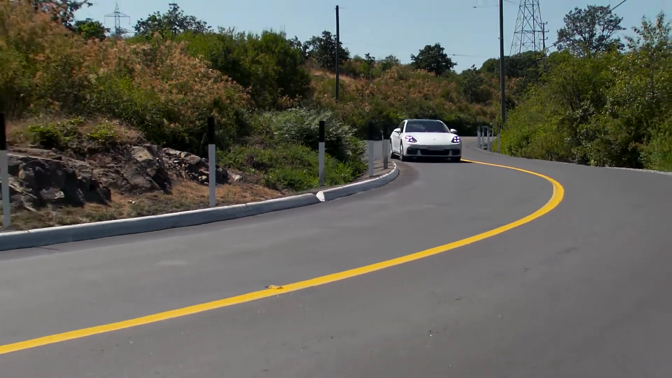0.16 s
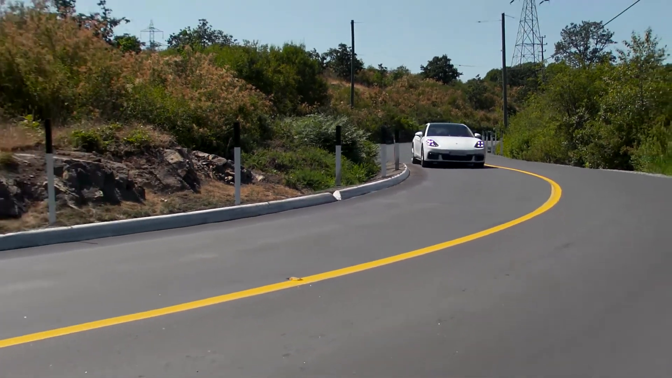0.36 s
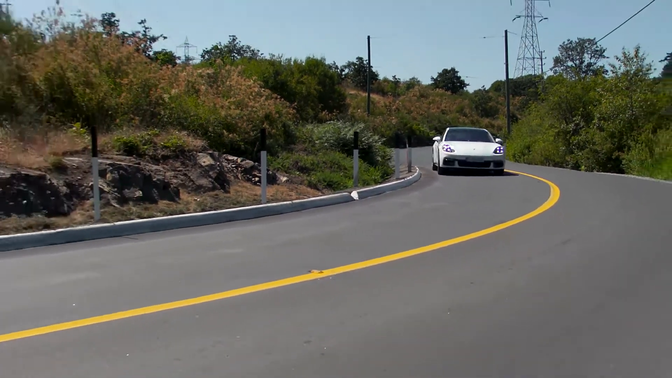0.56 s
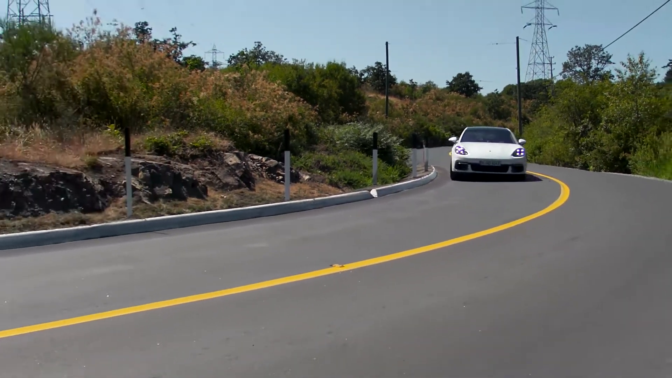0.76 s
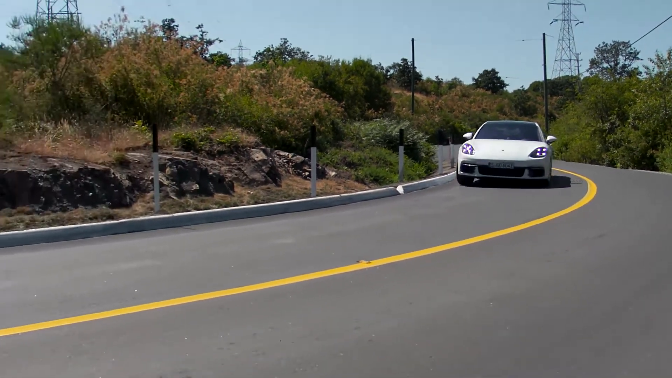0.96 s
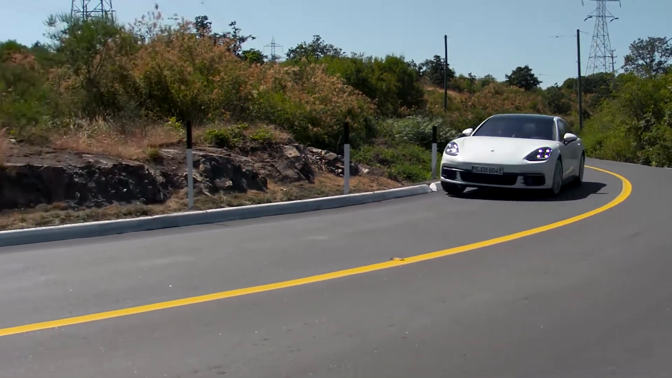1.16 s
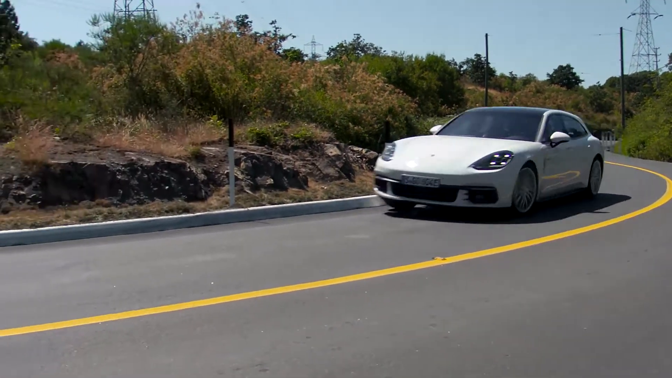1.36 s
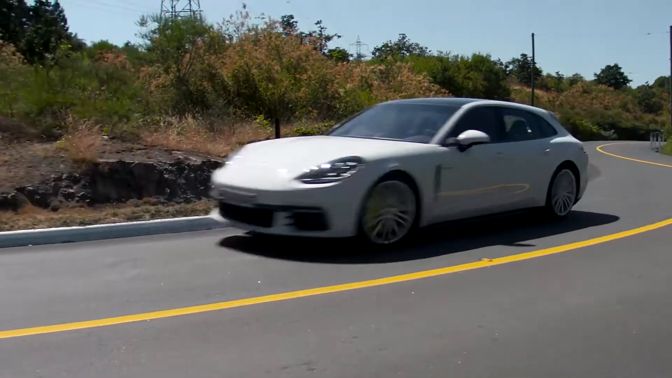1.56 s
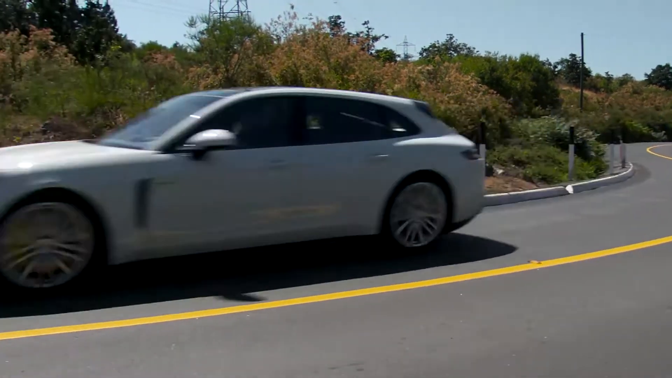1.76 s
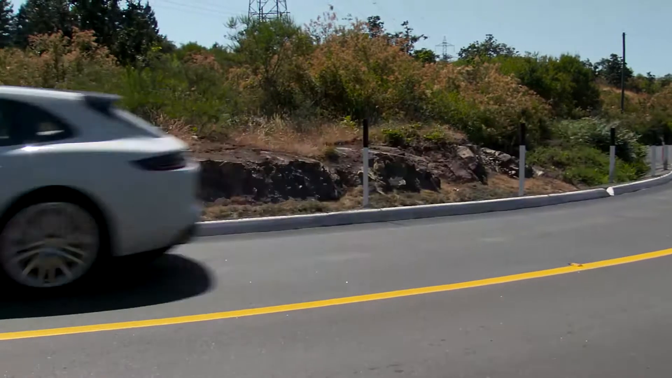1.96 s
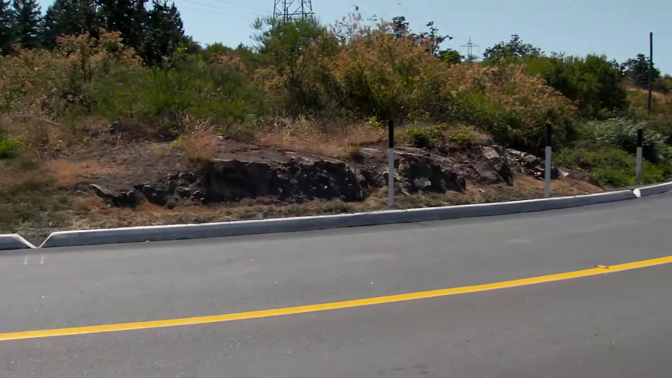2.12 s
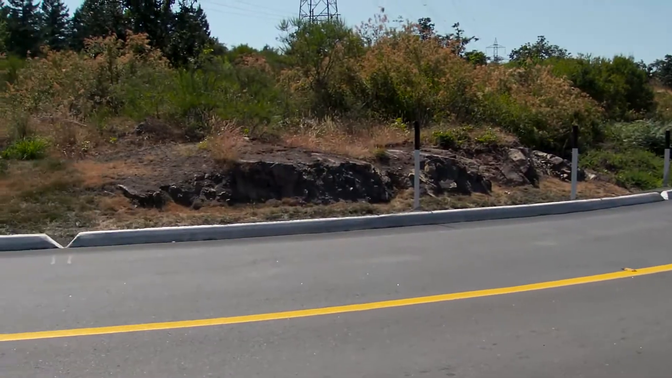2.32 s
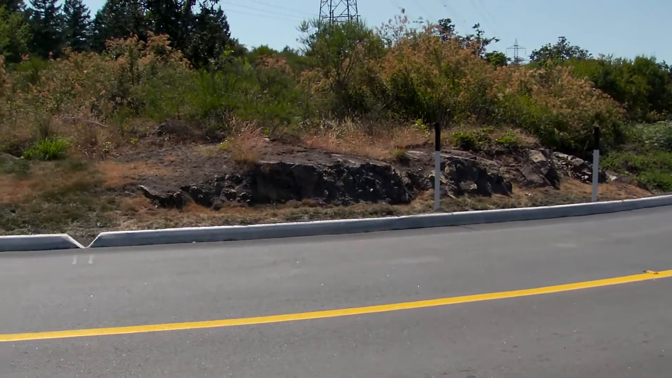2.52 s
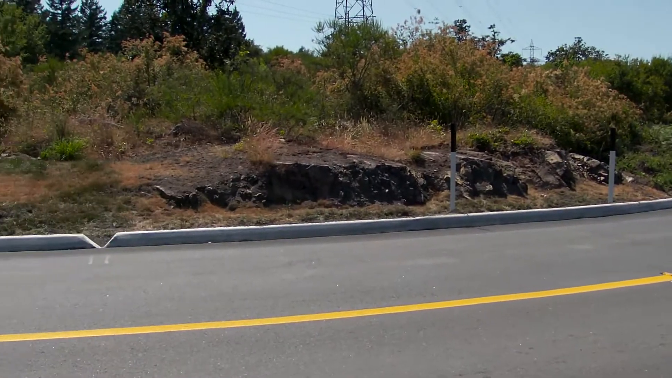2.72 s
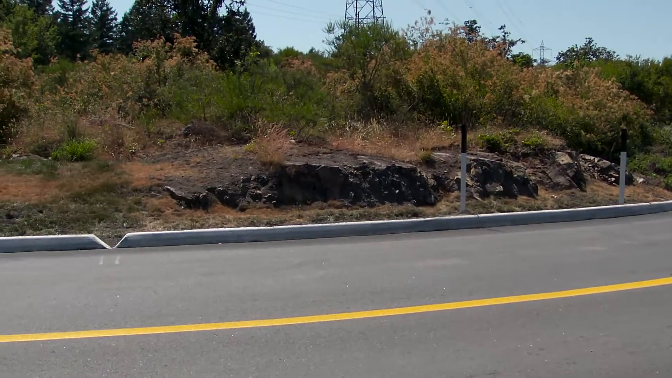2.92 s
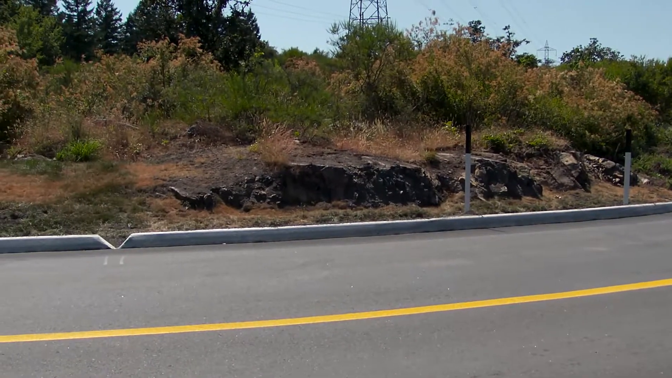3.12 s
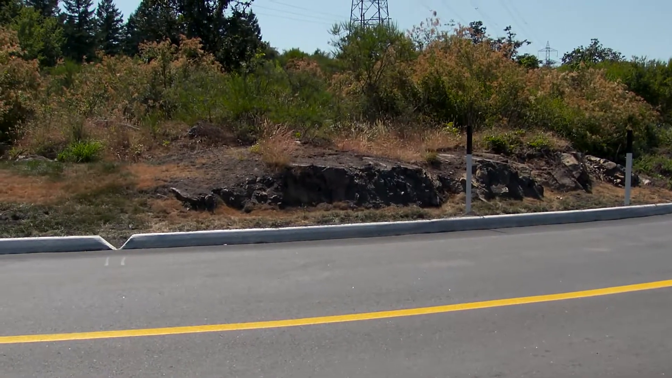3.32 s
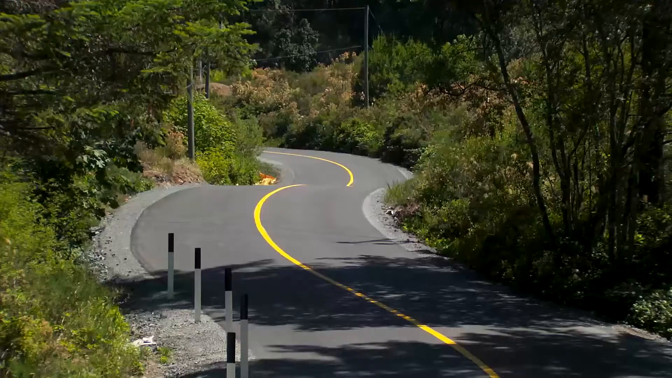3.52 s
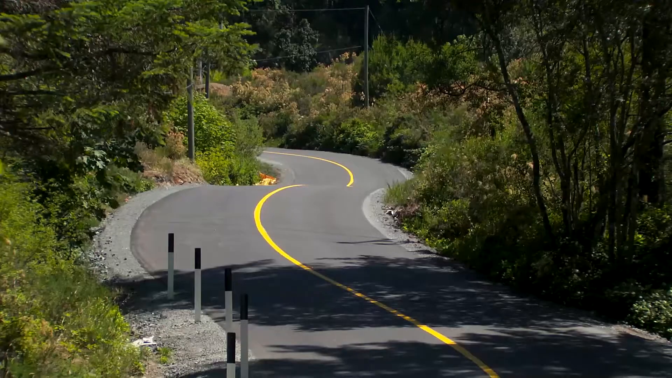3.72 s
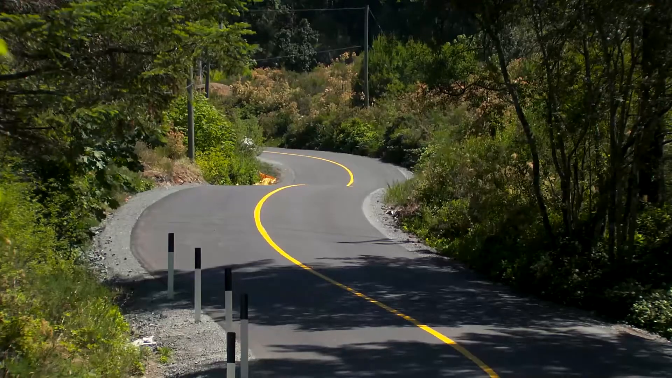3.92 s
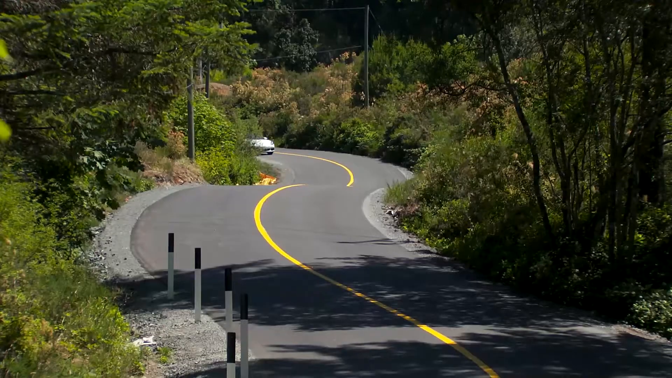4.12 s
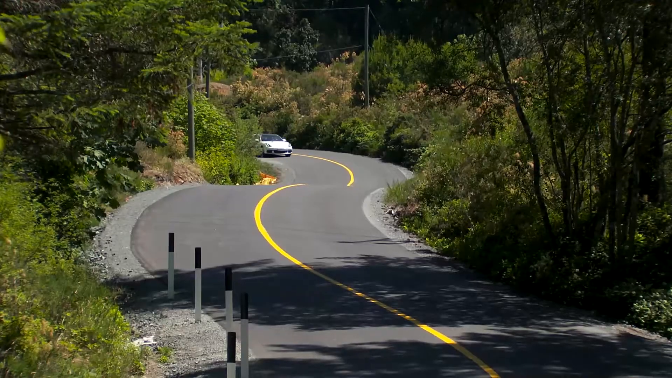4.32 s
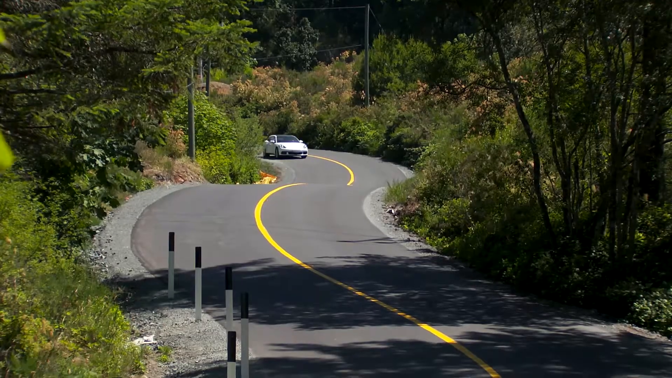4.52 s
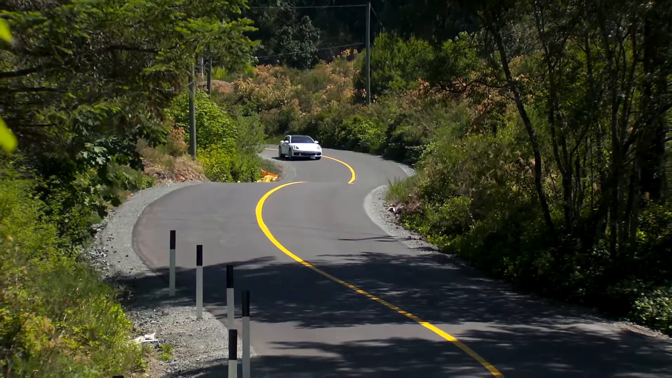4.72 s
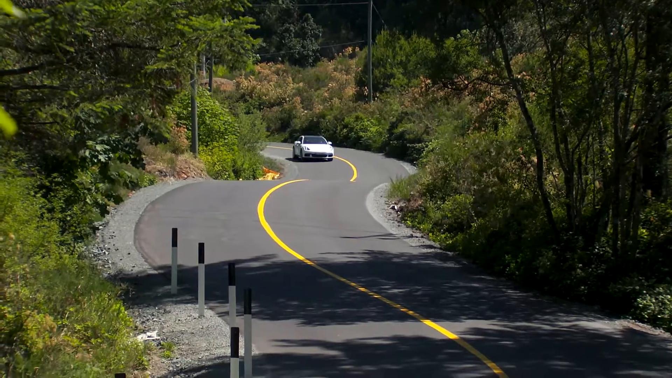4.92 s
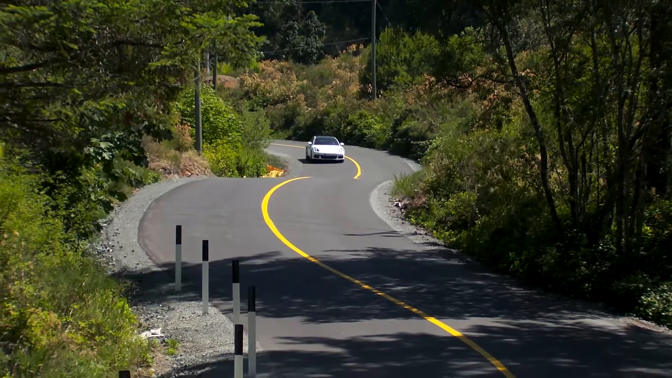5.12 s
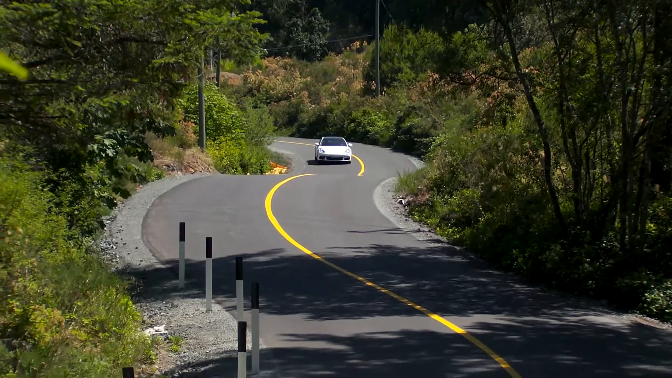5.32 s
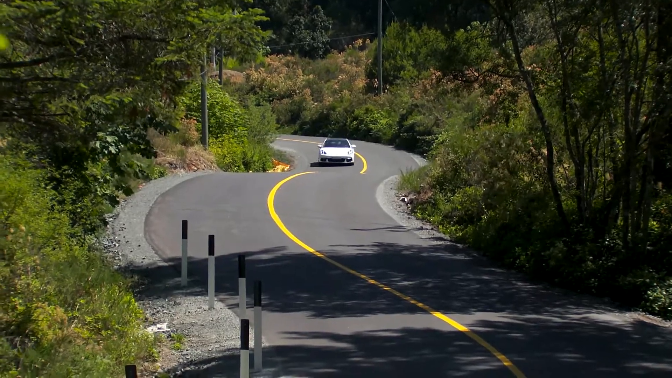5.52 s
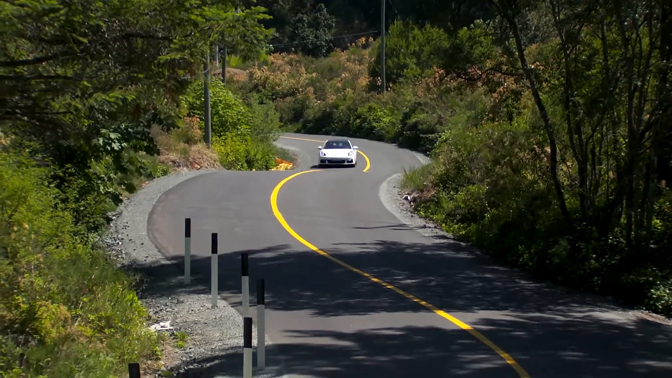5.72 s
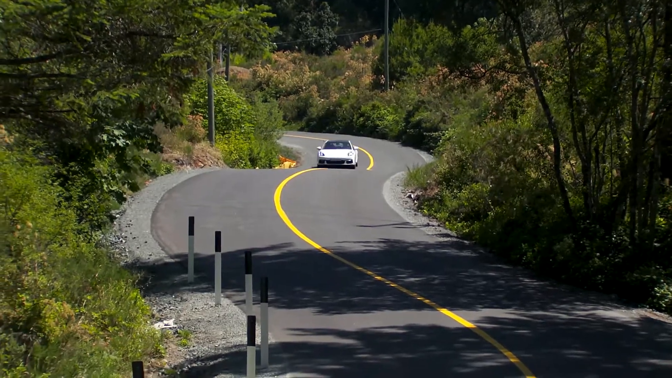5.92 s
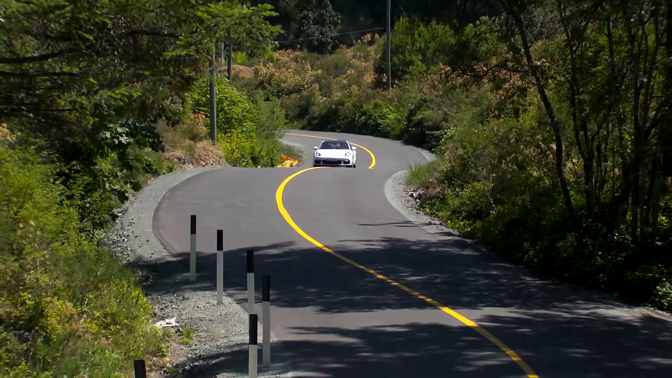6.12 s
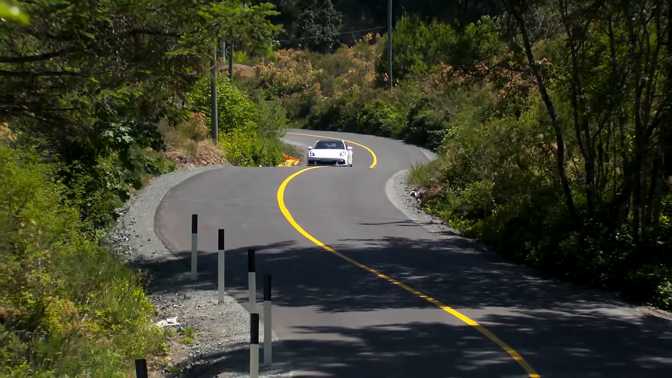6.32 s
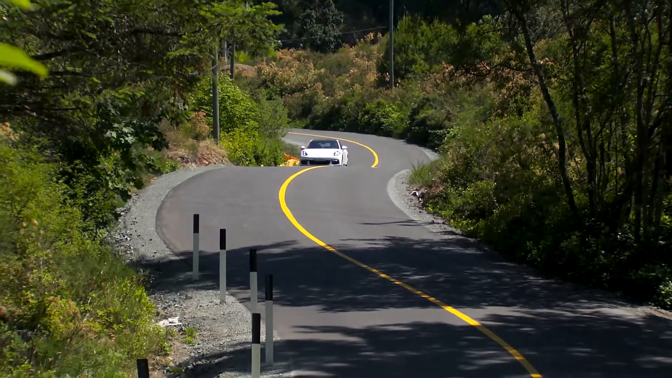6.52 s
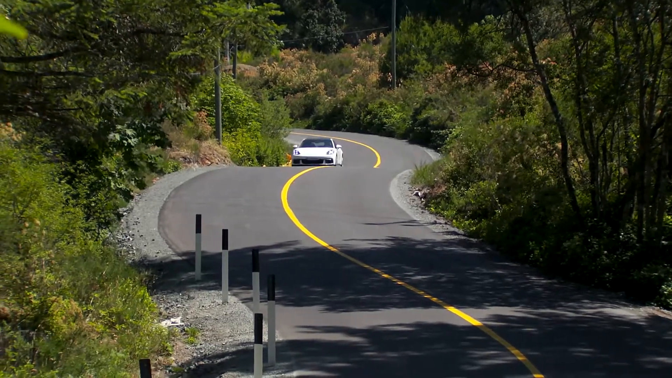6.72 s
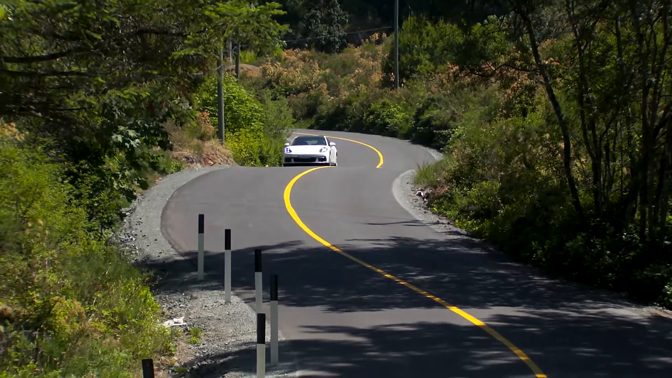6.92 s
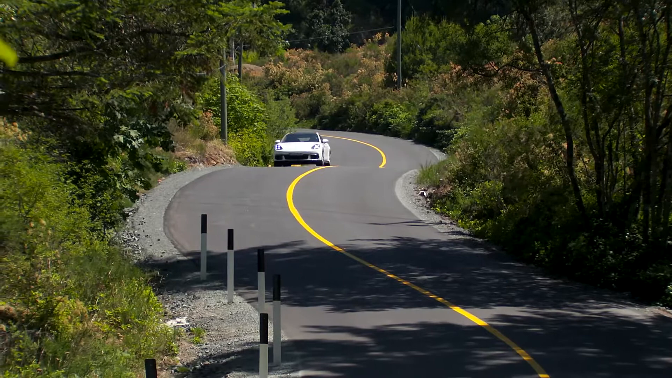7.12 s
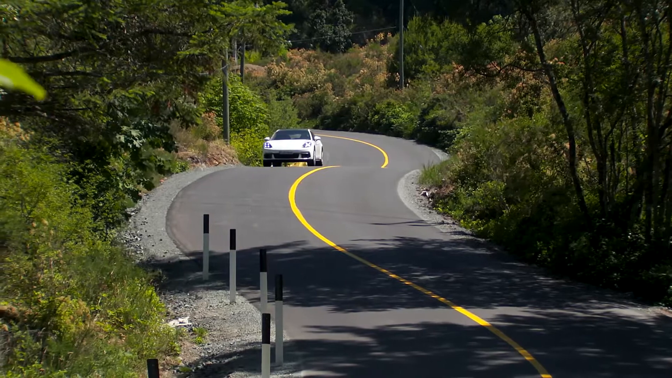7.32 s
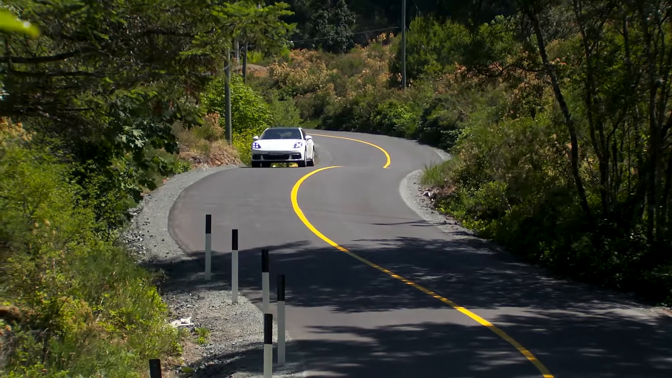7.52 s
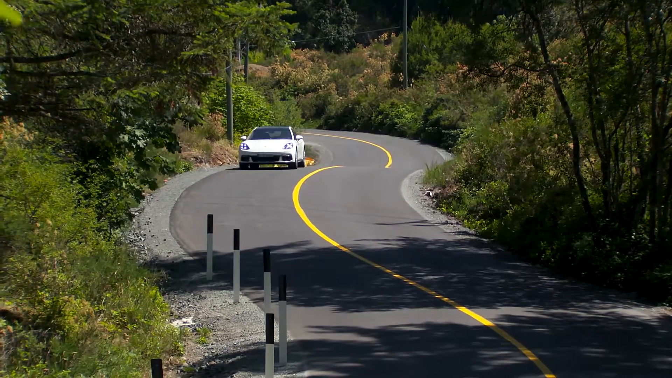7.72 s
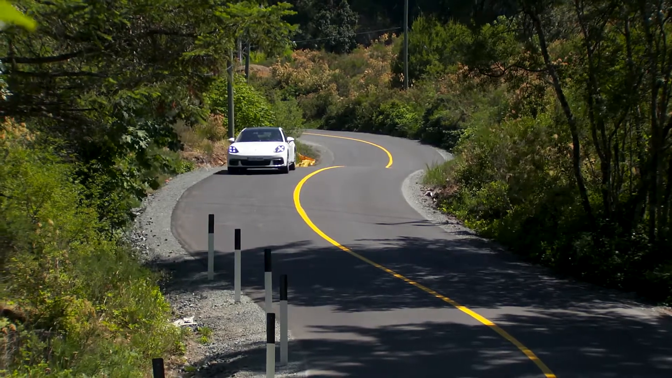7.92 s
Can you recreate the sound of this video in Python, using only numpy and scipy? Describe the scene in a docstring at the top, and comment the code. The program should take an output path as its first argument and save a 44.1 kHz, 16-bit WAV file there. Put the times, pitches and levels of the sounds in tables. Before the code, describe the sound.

Tyre roar and exhaust hum swell as a car rounds a bend, its tyres moaning briefly just before it passes the roadside microphone. As it recedes, the sound falls abruptly to a soft hillside hush. From this second position the car is much quieter, revving up in the distance and slowly coming closer, with another faint moan from the tyres. Light, low wind thumps touch the microphone now and then.

```python
"""A six-cylinder car sweeps through a hillside bend and pulls away; then, from a second spot, it is
heard far off, climbing nearer. Its exhaust hums at multiples of the firing rate and a part under the
bonnet ticks along. The tyres roar on the road and moan under load as their tread sticks and slips.
Behind it lie a hillside hush, a few dry ticks and light wind bumping the microphone."""
import sys
import numpy as np
from scipy import signal
from scipy.io import wavfile
from scipy.ndimage import uniform_filter1d

SR = 44100
rng = np.random.default_rng(int(sys.argv[2]) if len(sys.argv) > 2 else 0)


def unload_audio(sound):
    """Save the sound as a 16-bit wav file, at the path given as the first command line argument."""
    columns = np.transpose(np.atleast_2d(sound))
    # keep every value between -1 and 1, then stretch to whole-number steps
    steps = np.round(np.clip(columns, -1, 1) * 32767)
    wavfile.write(sys.argv[1], SR, steps.astype(np.int16))


N = 355446
TIME = np.arange(N) / SR
SECOND_SPOT_S = 3.555  # the listening position changes here


def gain_of(db):
    return 10 ** (np.asarray(db) / 20)


def unit_rms(x):
    return x / np.sqrt(np.mean(x ** 2) + 1e-20)


def bell(x, centre, width):
    return np.exp(-.5 * ((x - centre) / width) ** 2)


def eq_curve(points, hz):
    """Join (hz, value) points along a log frequency axis."""
    point_hz, value = np.transpose(points)
    return np.interp(np.log(hz + 1), np.log(point_hz + 1), value)


def automation(rows, t):
    """One curve over t for each column after the time column."""
    times, *columns = np.transpose(rows)
    return [np.interp(t, times, column) for column in columns]


def add(mix, start_s, sound):
    part = mix[round(start_s * SR):][:len(sound)]
    part += sound[:len(part)]


def wander(rate_hz, size=N):
    """Random modulation of rms 1, low-passed at rate_hz."""
    return unit_rms(signal.lfilter(*signal.butter(2, rate_hz, fs=SR), rng.standard_normal(size)))


def shaped_noise(spectrum_db, size=1024):
    """Noise whose power in each bin follows spectrum_db(hz, t)."""
    hop = size // 4
    frames, hz = N // hop + 5, np.fft.rfftfreq(size, 1 / SR)
    real, imag = rng.standard_normal((frames, len(hz), 2)).T
    spectra = (real + 1j * imag) * gain_of(spectrum_db(hz[:, None], np.arange(frames) * hop / SR))
    return np.sqrt(1.5) * signal.istft(spectra, nperseg=size, noverlap=size - hop)[1][:N]


def unit_band(shape_db, hz, low_hz, high_hz):
    """Shift a spectrum so that one band holds power 1."""
    band = (hz >= low_hz) & (hz < high_hz)
    return shape_db - 10 * np.log10(np.sum(gain_of(2 * shape_db) * band, 0))


# Swell of the breeze: time_s, level_db
WIND_LEVEL = [(0, -56.5), (.6, -66), (.95, -63), (1.2, -54.5), (1.45, -60.5), (1.7, -55), (2.05, -61),
              (2.4, -65.5), (2.7, -59), (3, -60.5), (3.5, -69), (4.08, -66), (4.22, -61), (4.44, -62),
              (4.52, -64.5), (4.75, -69.5), (5.2, -71), (6, -67.5), (6.7, -63), (7, -56), (7.2, -59),
              (7.4, -58.5), (8.06, -60)]
# Its bass-heavy colour: freq_hz, gain_db
WIND_EQ = [(12, -32), (24, -6), (36, 1.5), (50, 4), (80, 2.5), (130, 3), (200, -30), (350, -100)]
# Bumps on the microphone: start_s, knock_db, knock_hz, push_db
WIND_BUMPS = [(0.182, -40, 129.5, -48), (0.546, -42.5, 89, -41), (1.032, -44, 74, -52.5),
              (4.163, -51.5, 102.6, -59.5), (4.3, -61.5, 84.7, -53), (4.405, -55.5, 100.8, -57.5),
              (4.966, -45, 89.6, -67.5), (6.408, -48.5, 138, -66.5), (6.786, -51.5, 135.6, -59.5),
              (6.997, -52.5, 80.7, -49), (7.036, -49.5, 72.7, -52), (7.528, -52, 80.9, -53)]


def wind():
    """Lumpy low pressure on the microphone; each bump is a short sagging knock over a deep push."""
    def spectrum_db(hz, t):
        return unit_band(eq_curve(WIND_EQ, hz), hz, 25, 110) + automation(WIND_LEVEL, t)[0]
    out = shaped_noise(spectrum_db, size=4096) * gain_of(0.65 * wander(4.5))
    knock_s, push_s, push_hz = 0.0505, 0.1105, 41
    age = np.arange(round(push_s * SR)) / SR
    knock_shape = np.sin(np.pi * np.minimum(age / knock_s, 1))
    push = np.sin(np.pi * (age / push_s) ** 0.7) * np.sin(2 * np.pi * push_hz * age)
    for start_s, knock_db, knock_hz, push_db in WIND_BUMPS:
        knock = knock_shape * np.sin(2 * np.pi * knock_hz * age * (1 - 0.41 * age))
        add(out, start_s, gain_of(knock_db) * knock + gain_of(push_db) * push)
    return out


# Snaps nearby: start_s, prefilter_level_db
DRY_TICKS = [(6.8152, -65), (6.8553, -62), (7.5787, -63)]


def dry_ticks():
    """Tiny bursts of bright noise that die at once."""
    out, age = np.zeros(N), np.arange(600) / SR
    for start_s, level_db in DRY_TICKS:
        add(out, start_s, gain_of(level_db - 60 * age / 0.034) * rng.standard_normal(len(age)))
    return signal.lfilter(*signal.butter(2, [3500, 9000], "band", fs=SR), out)


# Base colour of road and tyre, shared by the hush: freq_hz, gain_db
ROAD_EQ = [(60, -36), (115, -13.5), (160, -6), (205, 0.5), (260, 1), (420, -1.5), (640, -1), (800, 0),
           (1300, 1), (2200, 1.5), (2700, 0), (4400, -2.5), (5100, -6.5), (8500, 1)]
# Dark tilt of the hush: freq_hz, gain_db
HUSH_EQ = [(240, 14.5), (400, 17), (680, 12.5), (1650, -0.64), (3300, -11), (6000, -14.5), (11000, -27),
           (15500, -25)]
# Treble ride on the hush: time_s, gain_db
HUSH_AIR = [(3.5, 5), (6, 4), (6.5, 2.5), (8.06, -9)]


def hillside_hush_db(hz, t):
    """Spectrum of the hillside's soft bed, 16 dB quieter at the first spot."""
    level_db, fade_s = -75, .15
    colour = unit_band(eq_curve(ROAD_EQ, hz) + eq_curve(HUSH_EQ, hz), hz, 1292, 2078)
    air = automation(HUSH_AIR, t)[0] * np.clip(hz / 6000 - 1, 0, 1)
    return level_db + colour + air - 16 * np.clip((SECOND_SPOT_S - t) / fade_s, 0, 1)


# Ride of the roar, bass and hiss against the mids: time_s, level_db, bass_db, hiss_db, groove_amount
ROAR_RIDE = [(0, -52.5, 11, -11, 1), (.15, -50.5, 7.97, -11.5, 0.5), (.3, -50, 8.7, -11, 0.5),
             (.6, -42.5, 5, -14, 3), (.9, -41, 5.45, -13, -0.5), (1.35, -34.5, 0.93, -11, 2.5),
             (1.55, -31, 2.3, -12, 3.5), (1.65, -33, 7.12, -8.5, 8.5), (1.8, -32, 5.5, -10, 4),
             (1.95, -34, 9.97, -8, 4), (2.1, -37, 13.2, -4.5, 5.5), (2.25, -37.5, 12.5, -5.5, 1.5),
             (2.55, -39, 5.4, -13.5, -1), (2.85, -43, 4.7, -21, -2.5), (3, -47.5, 6.24, -23.5, -3),
             (3.35, -49.5, 3.34, -25.5, -1), (3.5, -57.5, 6.3, -24, 1), (3.62, -63.5, 2.95, -30.5, -0.5),
             (3.68, -79.5, 5, -19.5, 4), (3.9, -81.5, 6, -8, 1), (4.3, -75, 14.4, -6.5, 2.5),
             (4.7, -65.5, 10.96, -13.5, 4.5), (5.1, -62, 11.6, -7.5, 4), (5.5, -61.5, 9.15, -12, 4),
             (6.1, -61.5, 8, -10.5, 4), (6.3, -60.5, 7.9, -8, 7.5), (6.5, -59.5, 8.56, -14.5, 0.5),
             (6.9, -62, 9, -13.5, 0), (7.3, -56.5, 5.6, -12.5, 4.5), (7.6, -55.5, 4.97, -14.5, 5),
             (8.06, -52.5, 5.97, -13.5, 1.5)]
# Bands of its moving EQ: freq_hz
ROAR_BANDS = [240, 400, 680, 1650, 3300, 6000, 11000, 15500]
# Lowest band against the bass: time_s, gain_db
ROAR_RUMBLE = [(0, 6), (1, -1.5), (1.6, -1), (2, 0.5), (2.3, -1), (2.6, -0.5), (3.2, 6), (3.8, -1),
               (4.4, -2.5), (5.6, -8), (6.2, -0.5), (7, 3.5), (7.5, 4.5), (8.06, -1.5)]
# Upper treble against the hiss: time_s, gain_db
ROAR_FIZZ = [(0, -12), (.5, -9), (1, -13), (1.5, -11.5), (2, -11), (2.6, -12), (3, -9.5), (3.5, -11),
             (3.8, -10.5), (5, -11.5), (6.35, -13.5), (6.5, -5.5), (6.65, -11), (7.2, -10), (8.06, -15)]
# Ring of the tread grooves: time_s, pitch_hz, upper_ring_db
GROOVE_RING = [(0, 1107, 3.5), (1.3, 1110, 1), (2, 1055, -0.5), (3.5, 1080, 2), (5, 1098, 0),
               (6.3, 1018, 5), (6.9, 1038, 3.5), (7.3, 1051, 4), (8.06, 1050, 5)]


def car_roar_db(hz, t):
    """Spectrum of tyre and exhaust noise, bent by distance and the car's heading."""
    pass_s, opening_s, upper_ring_hz = 2.075, 1.92, 2182
    level, bass, hiss, groove_amount = automation(ROAR_RIDE, t)
    rumble = bass + automation(ROAR_RUMBLE, t)[0]
    fizz = hiss + automation(ROAR_FIZZ, t)[0]
    # The top of the treble survives only the short air path at the pass.
    slope_db_per_s = np.where(t < pass_s, 25, 22)
    top = -60 + np.maximum(30 - slope_db_per_s * abs(t - pass_s), 0)
    bands = [rumble, bass + 0.083 * (rumble - bass), bass, 0 * t, hiss, fizz, top, top + (top - fizz) / 2]
    tilt = sum(eq_curve(list(zip(ROAR_BANDS, weights)), hz) * band_db
               for weights, band_db in zip(np.eye(len(bands)), bands))
    colour = unit_band(eq_curve(ROAD_EQ, hz) + tilt, hz, 1292, 2117)
    # Air pumped in the grooves rings at a drifting pitch and, weaker, near its octave.
    groove_hz, upper_db = automation(GROOVE_RING, t)
    rings = 1.233 * groove_amount * bell(hz, groove_hz, 92) + upper_db * bell(hz, upper_ring_hz, 140)
    # Treble above 10 kHz is cut, opening briefly with a lift of hiss near 1.9 s.
    opening = bell(t, opening_s, .05)
    treble_cut = -10 * np.clip((hz - 10140) / 800, 0, 1) * (1 - opening)
    hiss_lift = 4 * np.clip(hz / 3000 - 1, 0, 1) * opening
    return level + colour + rings + treble_cut + hiss_lift


def roar_over_hush():
    """Car roar and hillside hush add in power, lightly mottled across pitch and time."""
    def spectrum_db(hz, t):
        power = gain_of(2 * car_roar_db(hz, t)) + gain_of(2 * hillside_hush_db(hz, t))
        mottle = rng.standard_normal((len(t), len(hz))).T
        mottle = uniform_filter1d(uniform_filter1d(mottle, size=9, axis=0), size=12, axis=1)
        return 10 * np.log10(power) + 0.76 * unit_rms(mottle)
    return shaped_noise(spectrum_db)


# Ticking hiss, up when the nose faces the microphone: time_s, level_db
BONNET_LEVEL = [(0, -74), (.49, -63), (.74, -61), (.8, -65), (1.1, -66.5), (1.55, -54), (1.86, -53.5),
                (2, -48), (2.33, -71), (2.51, -92), (3.52, -96), (4.8, -95), (5.12, -82.5), (5.5, -83.5),
                (5.93, -92.5), (6.33, -87.5), (6.69, -94.5), (6.9, -82), (7.05, -80), (7.12, -75),
                (7.32, -71.5), (7.52, -74.5), (7.62, -75), (7.77, -74), (7.9, -71), (8.06, -73.5)]
# Accent on each of the six cylinders: gain_db
CYLINDER_ACCENTS = [2, -8.5, -6.5, -5, -9.5, -9.5]
# Ring of the ticking part, first spot then second: pitch_hz
BONNET_PITCH = [4470, 4560]
# Damping of that ring, by spot: width_hz
BONNET_RING_WIDTH = [520, 380]
# Spread of the hiss around it, by spot: width_hz
BONNET_HISS_WIDTH = [330, 200]


def bonnet_ticking():
    """A small part under the bonnet ticks unevenly at each firing and rings briefly in narrow hiss."""
    firing = np.floor(firing_count()).astype(int)
    accent = gain_of(np.array(CYLINDER_ACCENTS)[firing % 6] + 1.4 * wander(150))
    strikes = (np.diff(firing, prepend=0) > 0) * accent
    age, tick_gain, spots = np.arange(400) / SR, .75, []
    for pitch_hz, ring_width, hiss_width in zip(BONNET_PITCH, BONNET_RING_WIDTH, BONNET_HISS_WIDTH):
        ring = age * np.exp(-np.pi * ring_width * age) * np.sin(2 * np.pi * pitch_hz * age)
        ticks = unit_rms(signal.oaconvolve(strikes, ring)[:N])
        hiss = shaped_noise(lambda hz, t: unit_band(-4.3 * ((hz - pitch_hz) / hiss_width) ** 2, hz, 0, SR))
        spots.append(tick_gain * ticks + np.sqrt(1 - tick_gain ** 2) * hiss)
    return gain_of(automation(BONNET_LEVEL, TIME)[0]) * np.where(TIME < SECOND_SPOT_S, *spots)


# Tyres moaning in the near bend: time_s, pitch_hz, level_db, upper_voice_db
NEAR_BEND_MOAN = [(1.2, 1008, -44.5, -36), (1.25, 1015, -25, -36.5), (1.28, 1020, -23.5, -39.5),
                  (1.31, 1025, -24.5, -37), (1.35, 1000, -29, -29), (1.39, 1020, -21.5, -26.5),
                  (1.41, 1020, -24.5, -33.5), (1.44, 1029, -30.5, -37.5), (1.47, 995, -30, -37),
                  (1.51, 1003, -23.5, -26.5), (1.57, 1020, -25.5, -27.5), (1.6, 1060, -24.5, -31.5),
                  (1.63, 1075, -28, -24), (1.66, 1047, -27, -40), (1.73, 1080, -28, -32),
                  (1.78, 1065, -22.5, -31), (1.83, 1010, -37.5, -49.5), (1.86, 1030, -36.5, -40),
                  (1.9, 1001, -30.5, -26.5), (1.94, 960, -41.5, -36), (1.99, 966, -36, -53.5)]
# Tyres far off in the lower bend: time_s, pitch_hz, level_db, upper_voice_db
FAR_BEND_MOAN = [(7.08, 1010, -72.5, -74.5), (7.18, 1006, -52, -63), (7.3, 1003, -62, -63),
                 (7.42, 990, -59.5, -61.5), (7.52, 982.7, -52, -57), (7.65, 982.6, -67, -63.5),
                 (7.76, 996.6, -56.5, -60.5), (7.84, 973.4, -58.5, -51), (7.95, 973, -60, -52),
                 (8.06, 974.7, -54.5, -54.5)]
# Grip-and-slip surges in the near bend, ahead of each voice's send: start_s, peak_db, length_s
SLIP_SURGES = [(1.311, -13.5, 0.072), (1.377, -21.5, 0.0156), (1.399, -14, 0.0233), (1.454, -12, 0.0432),
               (1.507, -11.5, 0.0218), (1.531, -16, 0.0245), (1.55, -14.5, 0.033), (1.609, -21, 0.027),
               (1.645, -11, 0.0321), (1.688, -16, 0.0133), (1.717, -21.5, 0.022), (1.778, -5.5, 0.0051),
               (1.791, -10, 0.0086), (1.799, -22, 0.014), (1.887, -19, 0.024)]


def tyre_moan(rows):
    """Tread blocks stick and slip in two close, wavering voices, partly smeared into noise."""
    out, t = np.zeros(N), np.arange(rows[0][0], rows[-1][0] - 1 / SR, 1 / SR)
    pitch_hz, main_db, upper_db = automation(rows, t)
    surge = sum(gain_of(peak_db) * np.sin(np.pi * np.clip((t - start_s) / length_s, 0, 1)) ** 0.7
                for start_s, peak_db, length_s in SLIP_SURGES)
    fade_in = np.minimum((t - t[0]) / 0.014, 1)
    smear_gain, smear_hz = 0.302, 110
    voices = (main_db, 1, 0.01856, 1.1, 0.776), (upper_db, 1.106, 0.014, 3.9, 0.11)
    for level_db, ratio, waver, flutter_db, surge_send in voices:
        phase = 2 * np.pi * np.cumsum(pitch_hz * ratio * (1 + waver * wander(46.2, len(t)))) / SR
        sustain = fade_in * gain_of(level_db + 2.9 * np.tanh(wander(36, len(t))))
        smear = wander(smear_hz, len(t)) * np.sin(phase) + wander(smear_hz, len(t)) * np.cos(phase)
        tone = np.hypot(np.sqrt(1 - smear_gain ** 2) * sustain, surge_send * surge) * np.sin(phase)
        flutter = gain_of(flutter_db * np.tanh(wander(60, len(t))))
        add(out, t[0], flutter * (tone + smear_gain * sustain * smear / np.sqrt(2)))
    return out


# Rev curve of the engine: time_s, firing_rate_hz
REV_CURVE = [(0, 173.9), (.5, 167.2), (.95, 159.5), (1.65, 150.8), (1.95, 152.4), (2.15, 148.4),
             (2.35, 151.6), (3.15, 159.4), (3.41, 163.3), (3.63, 159.2), (4.6, 174.3), (5, 179.6),
             (5.45, 188.5), (5.9, 202.3), (6.27, 214.9), (6.36, 213.1), (6.44, 201.7), (6.53, 209.7),
             (6.62, 214), (7, 209), (7.25, 206), (7.5, 202.5), (8.06, 198)]


def firing_count():
    """Running count of cylinder firings, six to an engine cycle."""
    return np.cumsum(automation(REV_CURVE, TIME)[0]) / SR


# Faders of the first three exhaust harmonics: time_s, firing_tone_db, double_db, triple_db
EXHAUST_LEVELS = [(0, -44.5, -74, -71), (.2, -63, -68, -76), (.44, -47, -81.5, -59.5), (.55, -54, -75, -53),
                  (.7, -47.5, -66, -48), (1, -45, -52.5, -58.5), (1.2, -43, -63.5, -50),
                  (1.37, -46, -35.5, -40), (1.5, -50, -46, -52.5), (1.65, -60.5, -34.5, -40),
                  (1.78, -50, -46.5, -48.5), (1.96, -32.5, -27.5, -37.5), (2.08, -40, -29.5, -44),
                  (2.16, -36.5, -52.5, -36.5), (2.24, -42.5, -32.5, -35.5), (2.33, -37.5, -52.5, -32),
                  (2.42, -38, -43.5, -27.5), (2.55, -37, -41.5, -30.5), (2.7, -41.5, -44, -33.5),
                  (2.78, -42, -54, -56), (2.86, -45, -42, -41.5), (2.93, -42.5, -40, -45),
                  (3, -42.5, -42.5, -43), (3.08, -45, -48, -37), (3.22, -44, -48.5, -41.5),
                  (3.32, -45, -51, -39.5), (3.4, -46, -51.5, -45), (3.51, -56.5, -57.5, -56),
                  (3.63, -70, -76, -88.5), (3.95, -65.5, -79, -76), (4.5, -66, -73, -68),
                  (4.63, -62.5, -65, -68.5), (4.9, -60.5, -58.5, -72.5), (5.05, -57, -53.5, -57),
                  (5.2, -59, -50, -78.5), (5.33, -68, -52.5, -82), (5.48, -73.5, -46.5, -74.5),
                  (5.53, -65, -60, -66.5), (5.62, -68, -59.5, -59.5), (5.9, -66.5, -59, -82),
                  (6.1, -62, -64, -59.5), (6.27, -54.5, -57.5, -63), (6.38, -60, -57, -58),
                  (6.49, -46.5, -62, -82.5), (6.6, -53, -58, -72), (6.72, -63, -70.5, -69),
                  (7.26, -66, -79.5, -67)]
# Shimmer on each of the three: depth_db
EXHAUST_SHIMMER = [0, 1.5, 1]
# Side tones that swell between two times, in either order: firing_multiple, edge_s, other_edge_s, peak_db
SIDE_ORDERS = [(1.167, 0.0186, 0.272, -44), (2.74, .8, 1.297, -43), (1.72, 0.898, 1.211, -45.5),
               (.5, 1.2, 2.1, -49.5), (.5, 1.6, 2.92, -56.5), (1.5, 1.7, 2.1, -40.5),
               (8, 2.71, 3.35, -46.5), (10, 3.5, 3.3, -64), (5, 3.2, 3.4, -50), (1.5, 1.7, 3.6, -55),
               (1.5, 7.2, 7.25, -67), (2.668, 4.68, 5.55, -60), (1.5, 6.3, 6.5, -58.5),
               (1.833, 5.7, 7, -65.5), (1.05, 7.27, 7.4, -56.5), (1.02, 7.65, 7.4, -53.5),
               (1.2, 7.45, 10, -51), (2.5, 2.4, 2.15, -33.5), (5, 2.07, 2.13, -34), (5, 2.57, 3.8, -56.5),
               (7, 3.09, 3.48, -53)]


def engine():
    """Clean exhaust orders ride the firing rate, shimmering as the air path shifts."""
    out, phase = np.zeros(N), 2 * np.pi * firing_count()
    for order, (level_db, shimmer_db) in enumerate(zip(automation(EXHAUST_LEVELS, TIME), EXHAUST_SHIMMER), 1):
        amplitude = np.sqrt(2) * gain_of(level_db + shimmer_db * wander(7.5))
        out += amplitude * np.sin(order * (phase + 0.17 * wander(7.3)))
    out *= np.clip((EXHAUST_LEVELS[-1][0] - TIME) / 0.1, 0, 1)  # fade out into the last fader point
    for order, edge_s, other_edge_s, peak_db in SIDE_ORDERS:
        swell = np.sin(np.pi * np.clip((TIME - edge_s) / (other_edge_s - edge_s), 0, 1)) ** 0.66
        amplitude = swell * gain_of(peak_db + 3.3 * wander(6.3))
        out += amplitude * np.sin(order * phase + (0.3 + 0.12 * order) * wander(10))
    return out


def scene():
    """Mono mix of the car and the hillside around it."""
    mix = engine() + roar_over_hush() + tyre_moan(NEAR_BEND_MOAN) + tyre_moan(FAR_BEND_MOAN)
    return (mix + bonnet_ticking() + wind() + dry_ticks())[None]


def record(dry):
    """A steep high cut takes off the very top."""
    cutoff_hz = 15650
    return signal.oaconvolve(dry, signal.firwin(511, cutoff_hz, window=("kaiser", 9), fs=SR)[None], "same")


dry = scene()
out = record(dry)
unload_audio(out)
```